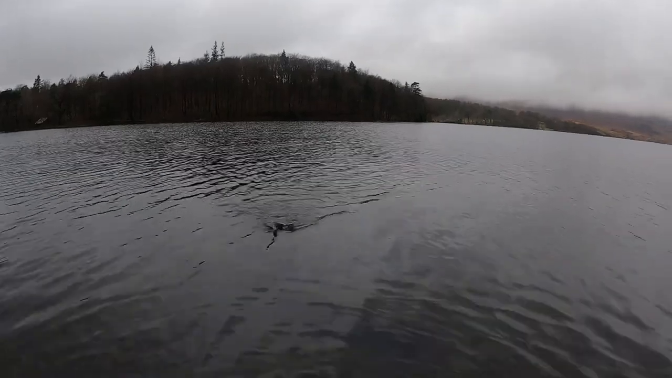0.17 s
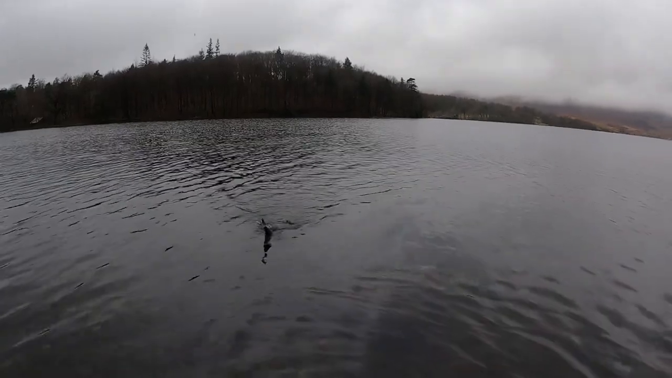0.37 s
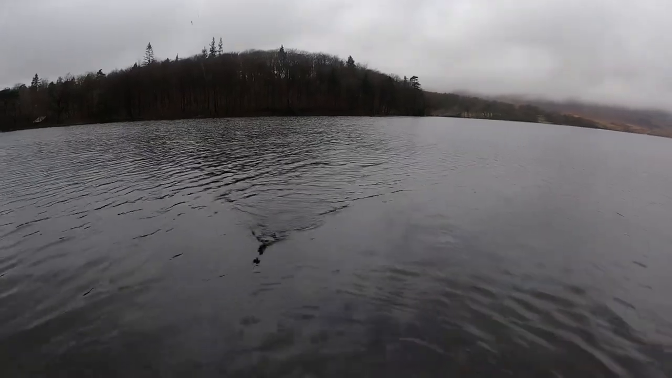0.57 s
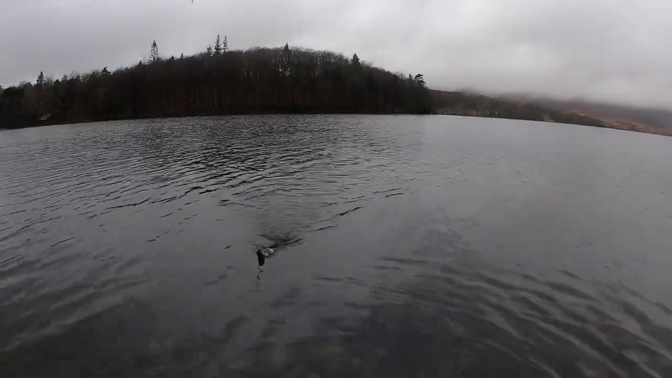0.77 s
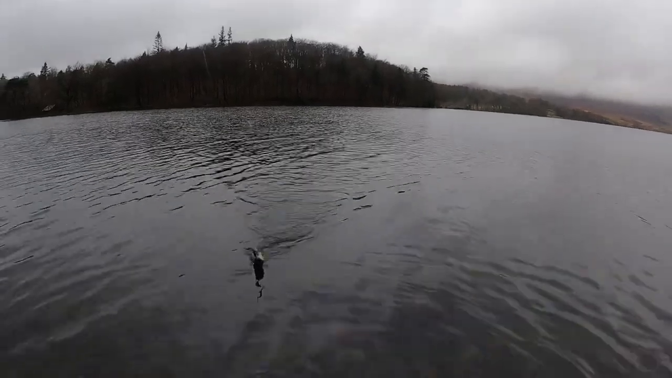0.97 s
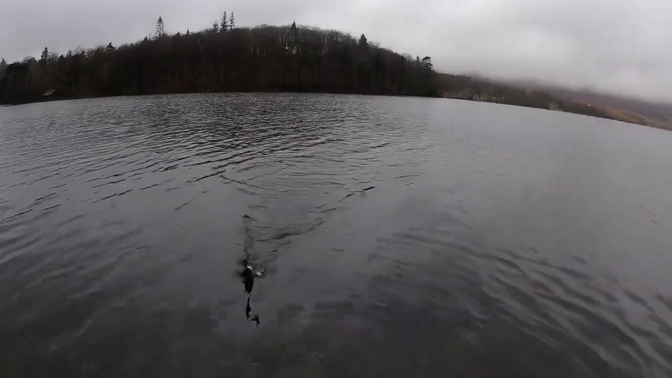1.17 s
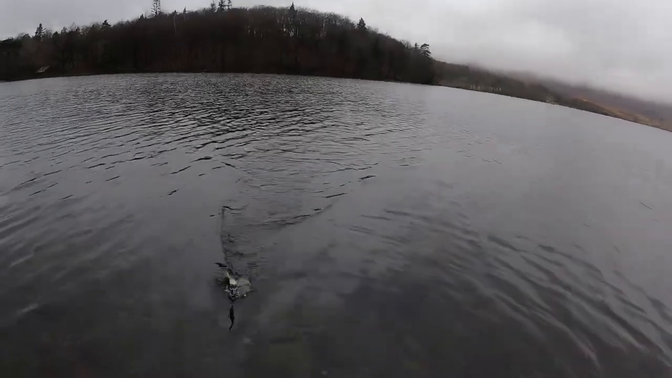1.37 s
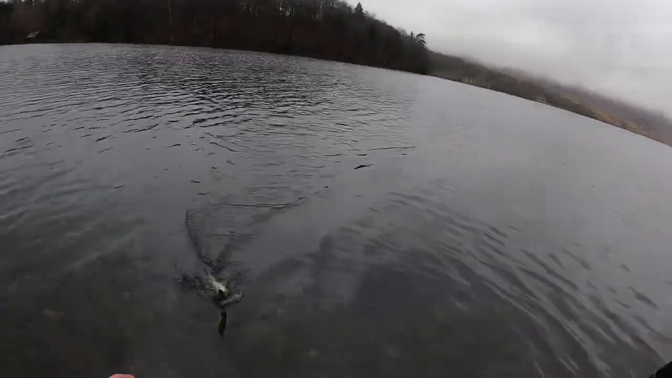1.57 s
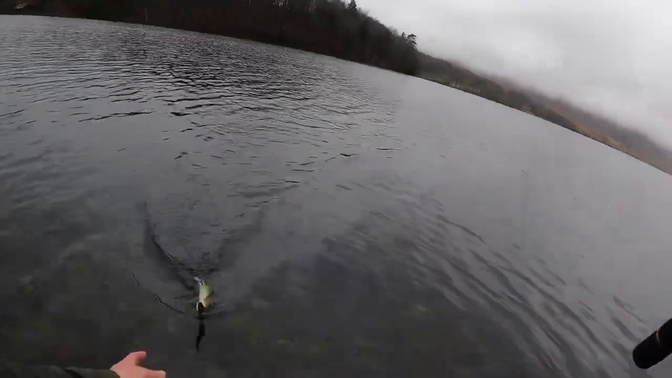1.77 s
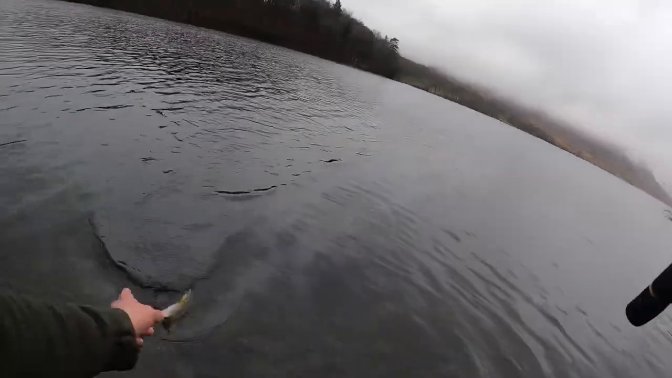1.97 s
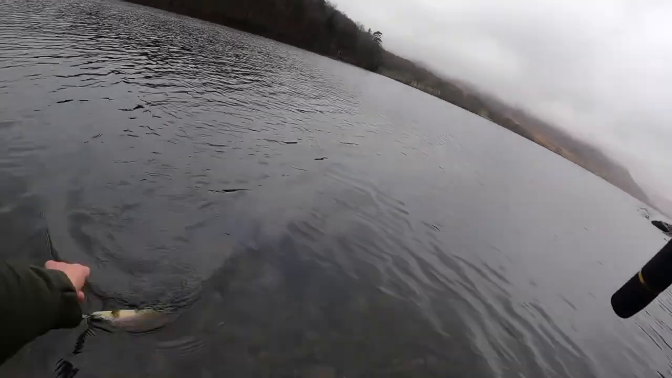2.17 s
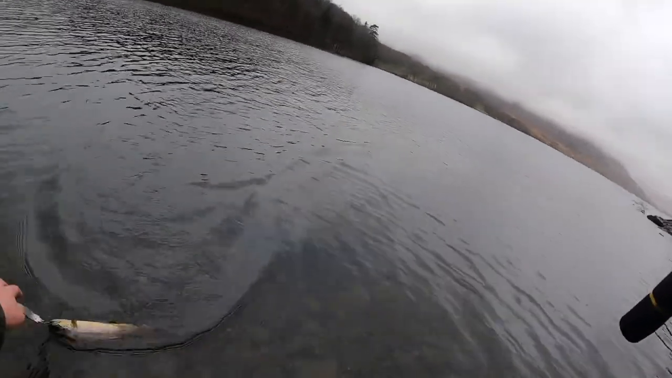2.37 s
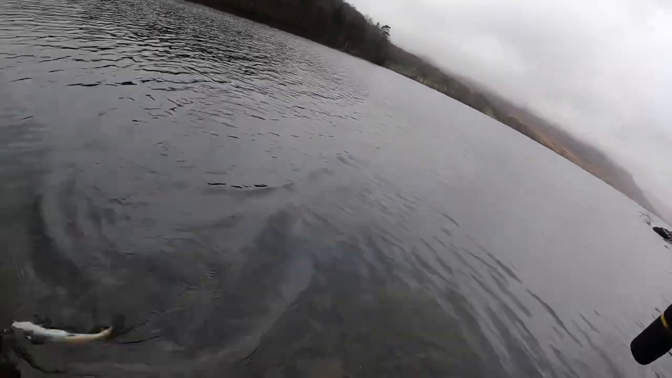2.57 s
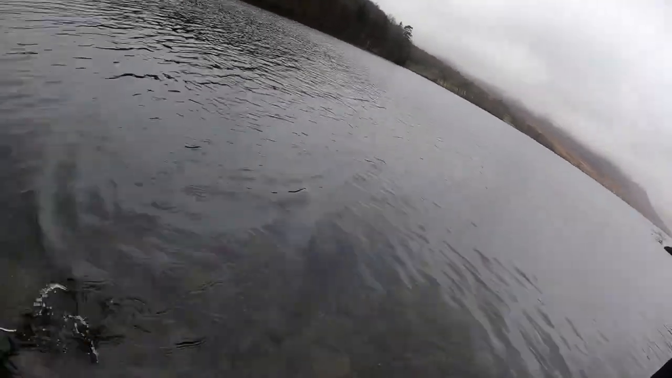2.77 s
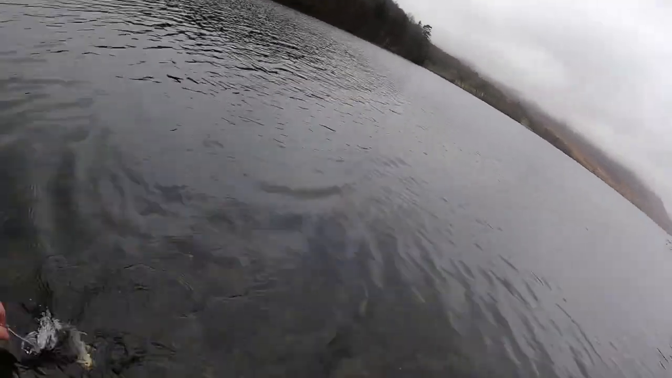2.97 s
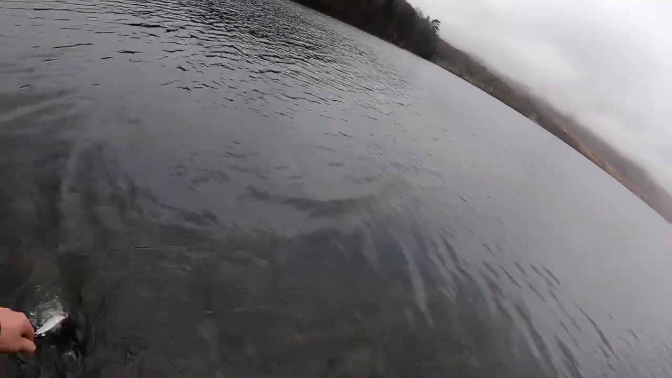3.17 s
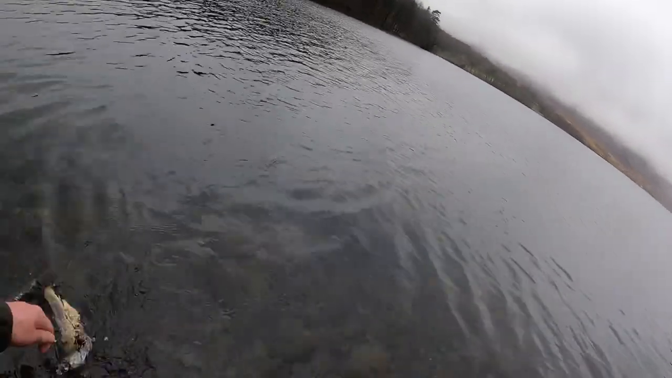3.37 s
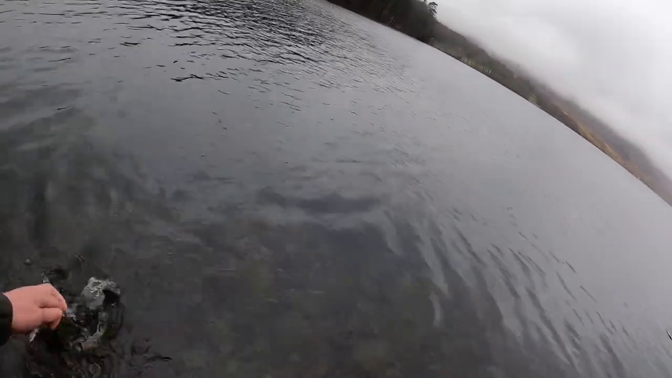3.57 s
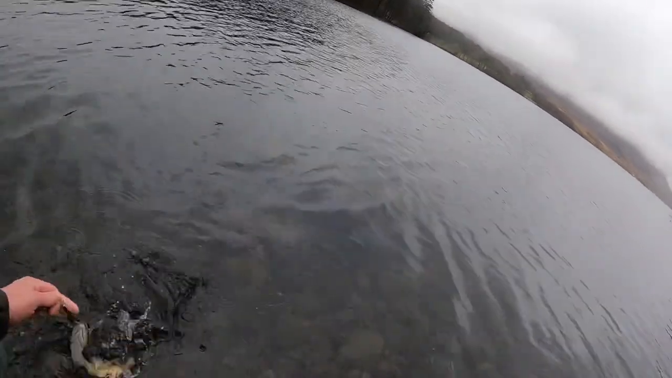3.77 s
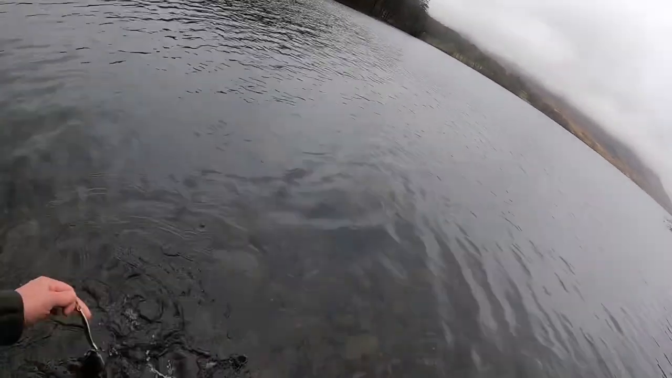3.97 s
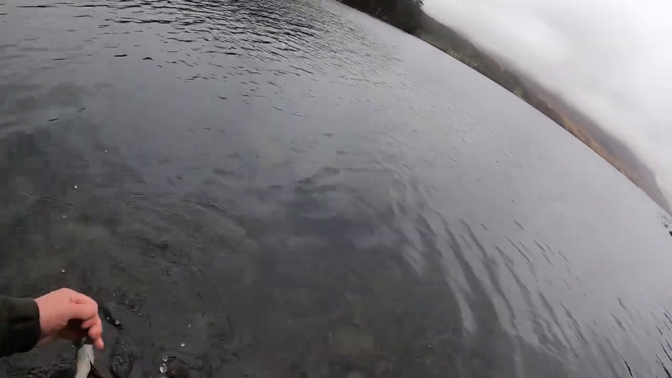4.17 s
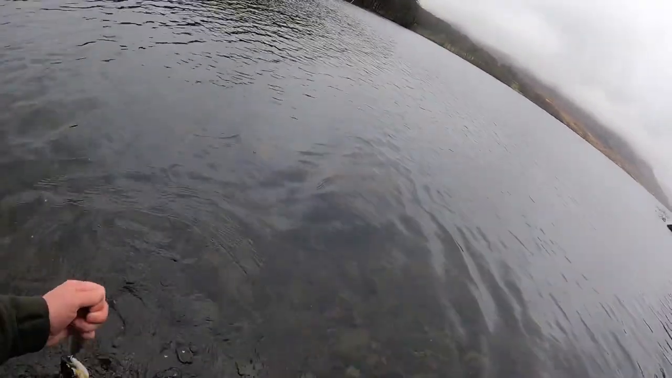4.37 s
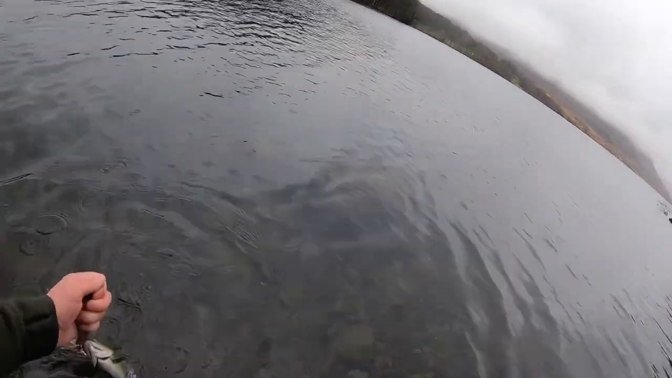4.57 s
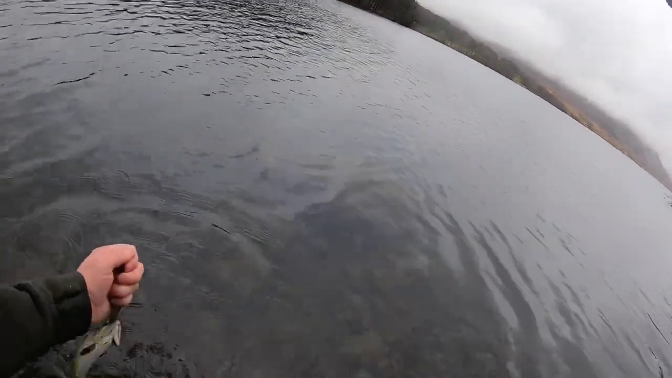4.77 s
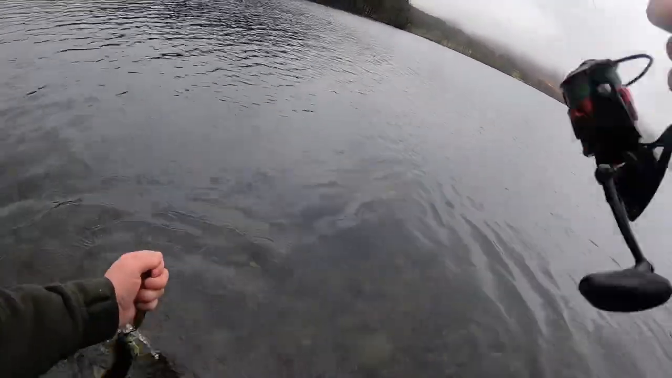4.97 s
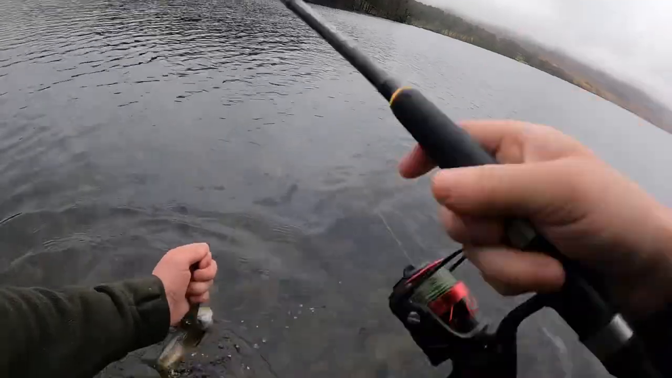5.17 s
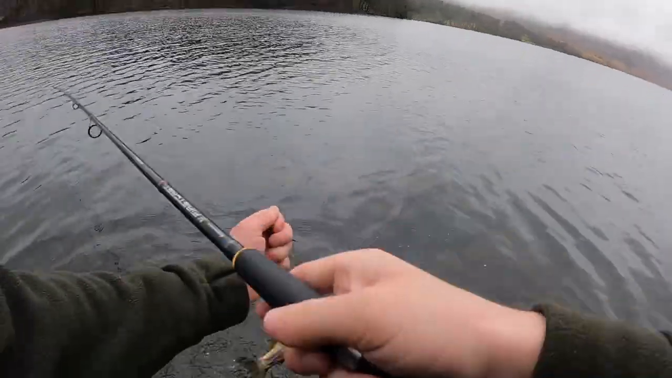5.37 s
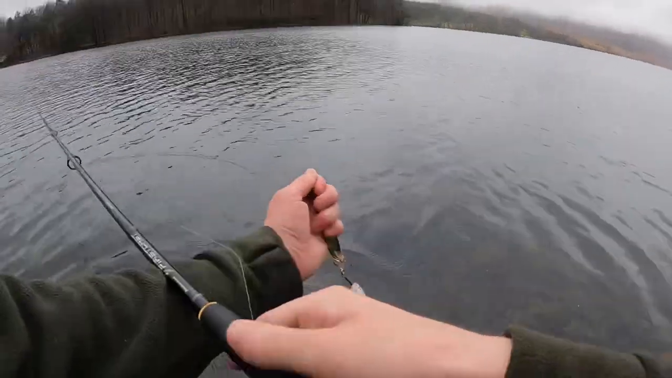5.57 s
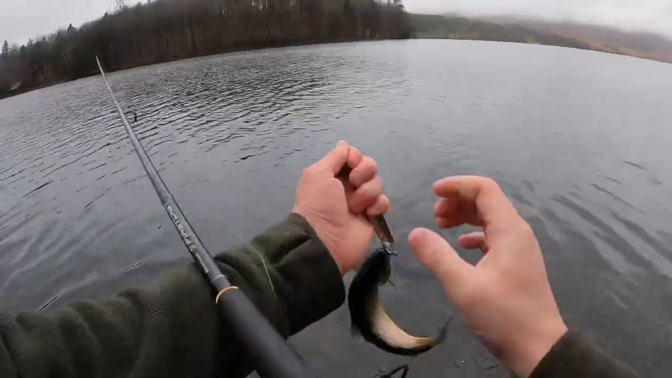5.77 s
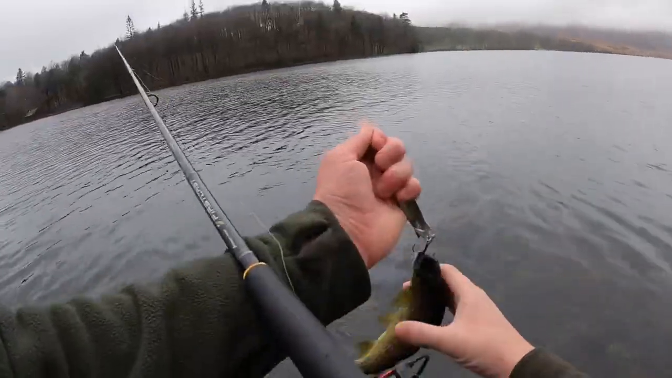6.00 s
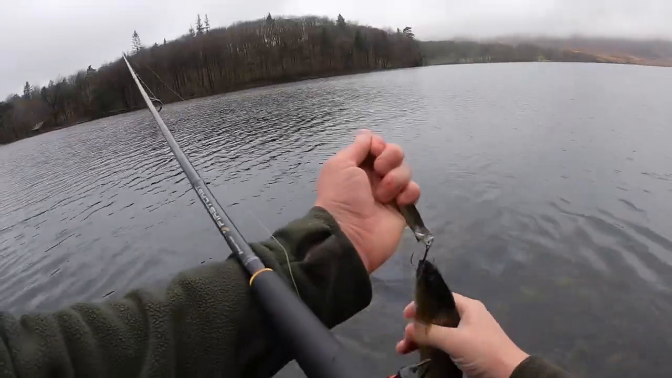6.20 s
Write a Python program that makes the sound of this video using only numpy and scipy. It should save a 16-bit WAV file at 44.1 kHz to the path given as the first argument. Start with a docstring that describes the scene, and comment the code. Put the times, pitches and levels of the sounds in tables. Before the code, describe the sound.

A small fish is drawn across a calm lake with light splashes and bubbly plinks. After a short lull it thrashes close by, slightly left, with sharp splashes, spray, a tail slap and a deep rising gulp. The splashing thins to drips as it is lifted out. A sleeve rustles and the rod bumps and clicks right at the body-worn microphone, over light wind rumble and faint distant lapping.

```python
"""A small fish is reeled across a calm lake, thrashes at the angler's feet and is lifted out on the line.
Each splash traps air bubbles that ring and glide in pitch, amid spray; drops fall from the hanging fish.
The microphone is worn on the body, with the water ahead and a little to the left. Close to it a sleeve
rustles and the rod is handled; light wind rumbles over distant lapping."""
import sys
import numpy as np
from scipy import signal
from scipy.fft import rfft, irfft, next_fast_len
from scipy.io import wavfile
from scipy.ndimage import uniform_filter1d

SR = 44100
rng = np.random.default_rng(int(sys.argv[2]) if len(sys.argv) > 2 else 0)


def store_wav(level_fs):
    """Save 16-bit WAV to argv[1]."""
    pcm = np.round(np.clip(np.atleast_2d(level_fs), -1, 1) * 32767)
    wavfile.write(sys.argv[1], SR, pcm.T.astype(np.int16))


N = 275000

# the fish stirs the water: start_s, length_s, churn_db, bubble_pitch_hz, spray_db
STROKES = [(0.0, 0.033, -47, 2190, -68.5), (0.163, 0.14, -56.5, 2680, -77), (0.371, 0.097, -58, 2500, -91),
           (0.639, 0.11, -59.5, 1520, -97), (1.079, 0.35, -60, 1624, -73), (1.5, 0.21, -61.5, 2340, -67),
           (2.778, 0.074, -48.5, 1445, -54), (2.858, 0.07, -53.5, 2590, -57),
           (3.039, 0.097, -50, 1566, -53), (3.129, 0.05, -53, 740, -63), (3.191, 0.04, -42, 1470, -48),
           (3.246, 0.038, -58, 850, -52), (3.292, 0.031, -54, 2410, -45), (3.37, 0.037, -47.5, 1820, -57),
           (3.52, 0.063, -48.5, 1960, -52.5), (3.573, 0.14, -43, 1460, -49.5),
           (3.773, 0.1, -41.5, 2240, -47.5), (3.87, 0.12, -52.5, 2700, -53), (4.03, 0.23, -54.5, 1250, -58),
           (4.271, 0.16, -50.5, 1895, -51.5), (4.593, 0.0082, -49.5, 1110, -46.5),
           (4.677, 0.17, -53.5, 1440, -59.5), (4.851, 0.065, -44.5, 1440, -52),
           (4.942, 0.21, -76, 2370, -59), (5.109, 0.012, -51.5, 4540, -43.5),
           (5.173, 0.12, -61, 2220, -58.5), (5.44, 0.051, -52, 3280, -50)]
STROKE_ATTACK_S = 0.0078
# bright hiss of fine droplets: frequency_hz, level_db
SPRAY_SPECTRUM = [(2000, -11), (3200, -8), (5200, 0.5), (8000, -3.5), (11500, -7), (13500, -15.5),
                  (15500, -32)]
# duller hiss of tearing water: frequency_hz, level_db
SHEET_SPECTRUM = [(400, -2.5), (1000, 5), (2200, 3), (3200, 0), (5200, -4), (8000, -22.5), (11500, -17),
                  (15000, -58)]


def from_db(db):
    """Decibels to gain."""
    return 10 ** (np.asarray(db) / 20)


def rms_one(x):
    """Scale to unit rms."""
    return x / np.sqrt(np.mean(x ** 2) + 1e-20)


def seconds(length):
    """Time axis of a short sound."""
    return np.arange(int(length * SR) + 2) / SR


def in_time(rows):
    """A curve of (time_s, value) points, sample by sample."""
    times, values = np.transpose(rows)
    return np.interp(np.arange(N) / SR, times, values)


def add(out, start_s, sound):
    """Mix a sound in from start_s."""
    at = max(round(start_s * SR), 0)
    out[at:at + len(sound)] += sound[:N - at]


def panned(x, pan_db):
    """Left louder by pan_db."""
    return x * from_db(pan_db * np.array([[.5], [-.5]]))


def colour(x, spectrum):
    """Shape by a spectrum that falls away steeply beyond its ends; rms 1."""
    hz, db = np.transpose(spectrum)
    size = next_fast_len(x.shape[-1])
    octave = np.log2(np.arange(size // 2 + 1) * SR / size + 1e-3)
    beyond = np.abs(octave - np.clip(octave, np.log2(hz[0]), np.log2(hz[-1])))
    gain = from_db(np.interp(octave, np.log2(hz), db) - 20 * beyond)
    return rms_one(irfft(rfft(x, size) * gain, size)[..., :x.shape[-1]])


def drift(per_s):
    """A random wander with about per_s turns a second; rms 1."""
    knots = rng.standard_normal(8192)
    return rms_one(np.interp(np.arange(N) / SR * per_s, np.arange(len(knots)), knots))


def stereo_noise(spectrum, side_db):
    """Coloured noise, mostly common to both channels; rms 1."""
    mid, side = rng.standard_normal((2, N))
    return colour(mid + from_db(side_db) * side * np.array([[1], [-1]]), spectrum)


def swell(t, length, attack_s, release_s):
    """Rise from t = 0, hold until length, die away."""
    return np.clip(t / attack_s, 0, 1) * np.exp(-np.clip((t - length) / release_s, 0, 20))


def swells(rows, attack_s, release_s):
    """Gain of overlapping swells (start_s, length_s, level_db); their powers add."""
    power = np.zeros(N)
    for start, length, db in rows:
        t = seconds(length + 10 * release_s) - min(start, 0)
        add(power, start, (from_db(db) * swell(t, length, attack_s, release_s)) ** 2)
    return np.sqrt(power)


def burst(spectrum, t60, attack_s=0.00055):
    """A puff of noise with a very quick onset, peak near 1."""
    t = seconds(t60)
    envelope = from_db(-60 * t / t60) * (1 - np.exp(-t / attack_s))
    noise = colour(rng.standard_normal(8192), spectrum)[:len(t)]
    return noise * envelope / envelope.max() / 2.5


def ring(hz, t60, rise=0, onset_cycles=0.44):
    """The dying sine of a bubble or a knock; its pitch changes by the fraction rise over t60 seconds."""
    t = seconds(t60)
    envelope = (1 - np.exp(-hz * t / onset_cycles)) * from_db(-60 * t / t60)
    return envelope * np.sin(2 * np.pi * hz * (t + rise * t * t / t60 / 2))


def swarm(per_s, low_hz, high_hz, cycles, spread_db, size=N):
    """Countless small bubbles of random size and strength, evenly active; rms 1."""
    out = np.zeros(N)
    for when, smallness, strength, ringing, rise in rng.random((int(per_s * size / SR), 5)):
        hz = low_hz * (high_hz / low_hz) ** smallness
        bubble = ring(hz, cycles * (.5 + ringing) / hz, 0.4 * rise ** 2, onset_cycles=2.4)
        add(out, when * (size - 1) / SR, from_db(spread_db * strength ** 2) * bubble)
    local_power = uniform_filter1d(out[:size] ** 2, size=2000)
    return out[:size] / np.sqrt(local_power + 1e-6)


def froth(spectrum):
    """Thousands of tiny bursts merge into a slightly grainy wash; rms 1."""
    return colour(rng.standard_normal(N) * from_db(2 * drift(700)), spectrum)


def churning(churn_db, froth_db, pitch_spread):
    """Each stroke folds in a cloud of bubbles around its own pitch, with a little froth."""
    gurgle, effort = np.zeros((2, N))
    t = seconds(.5)
    for start, length, db, hz, _ in STROKES:
        gain = from_db(db) * swell(t, length, STROKE_ATTACK_S, release_s=0.019)
        cloud = swarm(per_s=700, low_hz=hz / pitch_spread, high_hz=hz * pitch_spread,
                      cycles=26, spread_db=28, size=len(t))
        add(gurgle, start, gain * cloud)
        add(effort, start, gain)
    return from_db(churn_db) * gurgle + from_db(froth_db) * effort * froth(SHEET_SPECTRUM)


def crackle():
    """Fine droplets land in clumps as ticks of a few cycles; rms 1."""
    ticks = swarm(per_s=850, low_hz=2250, high_hz=14300, cycles=12, spread_db=25)
    clumps = from_db(3.5 * drift(45))
    return colour(np.diff(ticks, prepend=0) * clumps, SPRAY_SPECTRUM)


def spray(patter_db, mist_db, tick_db, drizzle_db, wake_db, wake_end_s):
    """Spray patters after each stroke and in the wake of the tow; what strokes throw up drizzles back."""
    throws = [(start, length, db) for start, length, _, _, db in STROKES]
    wake = from_db(wake_db) * (np.arange(N) / SR < wake_end_s)
    thrown = swells(throws, STROKE_ATTACK_S, release_s=0.043) + wake
    airborne = np.sqrt(np.minimum(thrown / from_db(-52), 1))   # gentle stirring lifts few droplets
    droplets = swarm(per_s=620, low_hz=2640, high_hz=12930, cycles=49, spread_db=42)
    patter = from_db(patter_db) * airborne * colour(droplets, SPRAY_SPECTRUM)
    ticks = from_db(tick_db) * crackle()
    mist = from_db(mist_db) * froth(SPRAY_SPECTRUM)
    falling = from_db(drizzle_db) * swells(throws, attack_s=0.09, release_s=0.18)
    drizzle = swarm(per_s=900, low_hz=1330, high_hz=8040, cycles=17, spread_db=21)
    return thrown * (patter + mist + ticks) + falling * drizzle


def gulps(level_db, flare_db, wobble_db, pitch_wobble):
    """Big air pockets ring low, creep up in pitch and quiver, then swoop and flare as their roof thins."""
    # pockets on their way to the surface: start_s, life_s, first_hz, last_hz, level_db, fade_db
    pockets = [(0.0, 0.099, 469, 800, -33, 37), (3.572, 0.064, 416, 1164, -27, 18.5),
               (4.0244, 0.3, 226.7, 1453, -13, 40), (4.17, 0.18, 360, 807, -40.5, 26),
               (5.547, 0.11, 546, 1390, -30, 26.5)]
    creep_share = 0.33   # the slow part of the climb
    swoop_at, swoop_width = 0.885, 0.1   # fractions of a pocket's life
    out = np.zeros(N)
    wander = drift(70)
    for start, life, first_hz, last_hz, db, fade_db in pockets:
        t = seconds(life)
        age = t / life
        quiver = wander[round(start * SR):][:len(t)] * age
        swoop = .5 + .5 * np.tanh((age - swoop_at) / swoop_width)
        climb = creep_share * age + (1 - creep_share) * swoop
        settling = 0.35 * np.exp(-t / 0.004)   # a new pocket starts sharp
        pitch = first_hz * (last_hz / first_hz) ** climb * (1 + settling + pitch_wobble * quiver)
        gain = from_db(db + level_db - fade_db * age + flare_db * swoop + wobble_db * quiver)
        edges = (1 - np.exp(-4 * first_hz * t)) * np.clip((1 - age) / swoop_width, 0, 1)
        add(out, start, gain * edges * np.sin(2 * np.pi * np.cumsum(pitch) / SR))
    return out


def diffuse_tail(water, spectrum, wet_db, t60):
    """The splashes smeared into a short dying tail, different in each channel."""
    t = seconds(t60)
    noise = colour(rng.standard_normal((2, 32768)), spectrum)[:, :len(t)]
    tail = noise * from_db(-60 * t / t60) * (t > .001)
    tail /= np.sqrt(np.sum(tail ** 2, axis=1, keepdims=True))
    return from_db(wet_db) * signal.fftconvolve(water[None], tail, axes=1)[:, :N]


def heard_from_bank(water):
    """Splashes follow the fish, mostly on the left; the right channel is shaded from their treble."""
    # direction of the fish: time_s, left_minus_right_db
    fish_pan = [(0, -1.5), (1.3, 0.5), (2.8, 4), (3.3, 3), (3.8, 1.6), (4.05, 1.5), (4.6, 2.5), (5.2, 2),
                (6.24, -2)]
    # a short bright shimmer that widens the spray's top: frequency_hz, level_db
    shimmer_spectrum = [(3000, -3), (9000, -6), (13000, -1.5), (15500, 7)]
    pan_db = in_time(fish_pan) + 2.6 * drift(49)   # drops land all around the fish
    treble = signal.sosfilt(signal.butter(1, 7000, "high", fs=SR, output="sos"), water)
    direct = panned(water, pan_db) + 0.19 * treble * np.array([[1], [-1]])
    shimmer = diffuse_tail(water, shimmer_spectrum, wet_db=-5, t60=0.082)
    bank_reflections = diffuse_tail(water, SHEET_SPECTRUM, wet_db=-24, t60=0.087)
    return direct + shimmer + bank_reflections


def wind(level_db, breeze_db):
    """A light breeze and a few puffs rumble at the microphone's ports."""
    # puffs: start_s, length_s, level_db
    gusts = [(-0.04, 0.13, -42), (0.34, 0.053, -47), (0.66, 0.46, -48), (3.46, 0.14, -46),
             (5.3, 0.61, -52.5)]
    # their rumble: frequency_hz, level_db
    rumble_spectrum = [(18, 4), (35, -4), (70, -1.5), (120, -14.5), (250, -23)]
    strength = np.hypot(from_db(breeze_db), swells(gusts, attack_s=0.01, release_s=0.13))
    lumps = from_db(level_db + 2 * drift(11))
    return panned(strength * lumps * stereo_noise(rumble_spectrum, side_db=-18), pan_db=-1.5)


def lake(level_db, lap_db):
    """Distant lapping merges into an even wash that wavers slightly."""
    # the wash: frequency_hz, level_db
    wash_spectrum = [(100, -5.5), (170, 3.5), (310, -6), (500, -14.5), (800, -22.5), (1500, -18.5),
                     (2700, -26), (4200, -35.5), (8000, -65), (11500, -39.5), (15500, -53)]
    return from_db(level_db + lap_db * drift(3.38)) * stereo_noise(wash_spectrum, side_db=-13.5)


def handling(thud_db, thud_cycles, scuff_db, scuff_t60, click_t60):
    """Each bump is a damped thud through the microphone mount and a brief scuff; the tackle clicks."""
    # bumps of rod, arm and jacket: start_s, level_db, pitch_hz, scuff_level_db
    bumps = [(0.003, -21, 212, -27.5), (0.008, -17.5, 69, -30), (0.04, -21, 71, -64), (0.106, -28, 36, -70),
             (5.314, -25.5, 95, -24), (5.325, -34, 156, -19.5), (5.339, -30, 182, -31.5),
             (5.353, -29.5, 30, -50), (5.579, -22.5, 280, -28.5), (5.589, -25, 125, -53),
             (5.765, -23.5, 326, -32.5), (5.779, -30, 290, -28), (5.874, -20.5, 318, -34)]
    # clicks of the tackle: start_s, level_db
    clicks = [(5.3138, -21), (5.3528, -23.5)]
    # tone of a scuff and of a click: frequency_hz, level_db
    scuff_spectrum = [(100, 15), (500, 4.5), (1200, 7), (2800, -18), (5000, -6.5), (12000, -26)]
    click_spectrum = [(500, -3), (1200, 13), (3000, 14.5), (6500, 0), (11000, -1.5), (15500, -26)]
    # side on which they reach the microphone: time_s, left_minus_right_db
    bump_pan = [(0, -7), (5.3, 1.5), (6.24, -0.5)]
    out = np.zeros(N)
    for start, db, hz, scuff_level_db in bumps:
        add(out, start, from_db(db + thud_db) * ring(hz, thud_cycles / hz))
        add(out, start, from_db(scuff_level_db + scuff_db) * burst(scuff_spectrum, scuff_t60))
    for start, db in clicks:
        add(out, start, from_db(db) * burst(click_spectrum, click_t60))
    return panned(out, in_time(bump_pan))


def plinks(ring_db, snap_db, snap_t60, linger_db, linger_cycles):
    """Single bubbles: a snap as the cavity closes, a gliding ring and a weak ring that lingers."""
    # the clearest bubbles: start_s, pitch_hz, level_db, rise_fraction (negative falls)
    bubbles = [(0.0197, 1320, -26.5, -0.48), (0.083, 750, -37.5, -0.066), (0.168, 1360, -32, 0.83),
               (0.2072, 2200, -41, 0.82), (0.286, 1980, -46, 0.97), (0.4442, 640, -34.5, 0.12),
               (0.5757, 1725, -39, 0.047), (0.6548, 3500, -40, -0.1), (0.7277, 1400, -41, 0.04),
               (0.855, 2380, -40, 0.27), (1.0669, 1690, -31, -0.45), (1.1453, 1210, -38, 0.0045),
               (1.1922, 3150, -29, -0.17), (1.2787, 2710, -29.5, -0.42), (1.3766, 1074, -39.5, -0.1),
               (1.5378, 2590, -39, 0.56), (1.603, 1490, -40, 0.55), (1.6946, 3300, -35.5, -0.39),
               (1.7168, 3270, -38.5, -0.12), (2.7281, 1290, -25, -0.71), (2.789, 1047, -30, -0.67),
               (2.8077, 2510, -19, 0.15), (2.809, 850, -28.5, -0.16), (2.8266, 2760, -27.5, -0.14),
               (2.8657, 2640, -24, 0.59), (2.891, 2840, -32.5, -0.12), (2.918, 2370, -35, 0.88),
               (2.933, 2020, -31.5, -0.47), (3.0353, 1355, -28.5, -0.42), (3.0954, 1150, -28, -0.12),
               (3.2205, 965, -27.5, -0.22), (3.29, 613, -37, -0.027), (3.3732, 1080, -30.5, -0.54),
               (3.5187, 1240, -31.5, 0.56), (3.5901, 1620, -25.5, 0.14), (3.6193, 790, -26, -0.23),
               (3.637, 1430, -27, -0.062), (3.6549, 596, -34.5, 0.29), (3.698, 1170, -32, -0.08),
               (3.749, 1320, -28, -0.37), (3.8323, 2085, -19, 0.28), (3.8457, 1784, -20, 0.69),
               (3.914, 3130, -27, 0.69), (4.0238, 1264, -17, -0.64), (4.092, 766, -37.5, 0.1),
               (4.149, 1370, -33.5, -0.026), (4.326, 2880, -31.5, 0.6), (4.3816, 3480, -32, 0.043),
               (4.495, 1290, -34.5, -0.32), (4.5976, 873, -27.5, 0.85), (4.6006, 1146, -27, 1.0),
               (4.6055, 733, -33, 0.45), (4.6995, 1650, -33.5, -1.2), (4.8477, 444, -25.5, 0.61),
               (4.8494, 943, -20, 0.37), (4.8606, 1436, -26.5, -0.12), (4.8625, 2610, -28, 1),
               (4.8758, 753, -20.5, 0.98), (4.9002, 1230, -28.5, 0.015), (4.995, 3130, -27, 0.98),
               (5.129, 4100, -27, 0.16), (5.15, 3530, -30.5, 0.03), (5.1963, 2360, -35, -0.05),
               (5.2792, 930, -34.5, 0.46), (5.5249, 2360, -30.5, 0.93)]
    # the closing cavity: frequency_hz, level_db
    snap_spectrum = [(400, 2), (1200, 0), (2500, 12.5), (5000, -3), (9000, -3.5), (15000, -22)]
    out = np.zeros(N)
    for start, hz, db, rise in bubbles:
        t60 = 0.037 * (1080 / hz) ** 0.6   # smaller bubbles die sooner
        add(out, start, from_db(db + ring_db) * ring(hz, t60, rise, onset_cycles=0.4))
        softening_db = 2 * rise   # bubbles that climb are pinched off gently, under the surface
        add(out, start, from_db(db + snap_db - softening_db) * burst(snap_spectrum, snap_t60))
        linger = ring(hz * (1 + .5 * rise), linger_cycles / hz, rise=0.15, onset_cycles=10)
        add(out, start, from_db(min(db, -22) + linger_db) * linger)
    return out


def water_sheets(level_db):
    """Sheets of water thrown by the tail tear with a hiss."""
    # each sheet: start_s, length_s, level_db
    sheets = [(0.442, 0.0073, -39.5), (3.193, 0.033, -47), (3.328, 0.025, -43), (3.575, 0.061, -44),
              (3.76, 0.023, -40), (3.806, 0.017, -30.5), (3.826, 0.023, -32)]
    gain = np.zeros(N)
    for start, length, db in sheets:
        add(gain, start, from_db(db + level_db) * signal.windows.tukey(int(length * SR), .2))
    return gain * froth(SHEET_SPECTRUM)


def smacks(crack_db, crack_t60, ping_db, ping_t60):
    """A drop or fin hits the surface with a very short crack, centred on its tiny ping."""
    # hits on the water: start_s, level_db, pitch_hz
    hits = [(1.1708, -38, 7260), (1.5877, -33, 6140), (2.7283, -35, 5260), (2.7526, -30, 2200),
            (2.789, -26.5, 3800), (2.8075, -18.5, 6500), (3.0115, -37.5, 5040), (3.1333, -32, 5100),
            (3.2031, -28.5, 7000), (3.2413, -30, 5270), (3.3464, -19, 5100), (3.3575, -28, 5500),
            (3.488, -32.5, 8230), (3.572, -20.5, 2570), (3.6545, -26.5, 6800), (3.6686, -22, 4870),
            (3.8232, -13, 5200), (3.8873, -29.5, 6130), (3.9386, -29, 4500), (3.7837, -21, 4230),
            (3.804, -32, 2010), (4.0236, -15.5, 7300), (4.1828, -32.5, 4250), (4.284, -33.5, 7200),
            (4.3672, -26, 7400), (4.4092, -35, 6000), (4.6955, -27.5, 5600), (4.506, -39, 6700),
            (4.605, -41.5, 5430), (4.9541, -33, 5440), (4.9932, -30.5, 6570), (5.0355, -32.5, 5900),
            (5.101, -40, 4900), (5.1175, -29, 6900), (5.2662, -28.5, 4200)]
    out = np.zeros(N)
    for start, db, hz in hits:
        crack_spectrum = [(hz / 4, -7), (hz, 0), (hz * 1.74, -9), (hz * 2.8, -30)]
        add(out, start, from_db(db + crack_db) * burst(crack_spectrum, crack_t60))
        add(out, start, from_db(db + ping_db) * ring(hz, ping_t60, rise=0.23, onset_cycles=1.4))
    return out


def sleeve(level_db, grain_db, bend_s):
    """Close to the microphone, cloth drags in small catches as an arm moves: a dull rub, a fine swish."""
    # arm movements in the jacket: start_s, length_s, rub_db, swish_db
    reaches = [(1.714, 0.62, -63, -70.5), (1.84, 0.17, -70, -63.5), (5.286, 0.063, -48, -48),
               (5.441, 0.15, -51, -51.5), (5.764, 0.11, -47, -50.5), (5.933, 0.22, -63, -59.5)]
    # tone of the rub and of the swish: frequency_hz, level_db
    rub_spectrum = [(40, -7), (130, -1.5), (330, 0.5), (600, -11), (1200, -53.5), (2500, -43)]
    swish_spectrum = [(600, 4.5), (1500, 4), (3000, 1), (5000, 1), (7500, -1), (9000, -10.5), (12000, -7),
                      (15000, -32)]
    attack_s, release_s = 0.065, 0.1
    moves = np.array(reaches)
    bent = np.clip((np.arange(N) / SR - bend_s) / attack_s, 0, 1)   # bending down keeps the cloth astir
    rub_gain = np.hypot(bent * from_db(-67), swells(moves[:, [0, 1, 2]], attack_s, release_s))
    swish_gain = np.hypot(bent * from_db(-69.5), swells(moves[:, [0, 1, 3]], attack_s, release_s))
    catches_db = grain_db * drift(140)
    rub = rub_gain * from_db(catches_db) * stereo_noise(rub_spectrum, side_db=-12)
    swish = swish_gain * from_db(catches_db / 2) * stereo_noise(swish_spectrum, side_db=-5.5)
    return from_db(level_db) * (rub + swish)


def tail_slap(start_s, pop_db, hz, t60, crack_db):
    """The tail lands flat and claps a pocket of air: a hard pop of a few cycles."""
    out = np.zeros(N)
    add(out, start_s, from_db(pop_db) * (ring(hz, t60) + .5 * ring(1.43 * hz, t60)))
    add(out, start_s, from_db(crack_db) * burst(SHEET_SPECTRUM, t60 / 2))
    return out


def line_slide(start_s, length_s, level_db):
    """The line slides through the fingers with a short hiss."""
    hiss_spectrum = [(3500, -6.5), (5500, 1), (7500, -5), (12000, -14)]   # frequency_hz, level_db
    gain = swells([(start_s, length_s, level_db)], attack_s=0.012, release_s=0.026)
    return gain * stereo_noise(hiss_spectrum, side_db=-16)


def scene():
    """The fish in the water ahead, the angler right at the microphone, the open lake behind it all."""
    water = churning(churn_db=-1, froth_db=-11.5, pitch_spread=2.016)
    water += spray(patter_db=-2, mist_db=-11, tick_db=-2.5, drizzle_db=-14.5,
                   wake_db=-69.5, wake_end_s=1.75)
    water += plinks(ring_db=-2, snap_db=-7.5, snap_t60=0.0065, linger_db=-9.5, linger_cycles=49)
    water += water_sheets(level_db=-3.5)
    water += smacks(crack_db=1, crack_t60=0.0049, ping_db=1.5, ping_t60=0.0048)
    water += tail_slap(start_s=3.8246, pop_db=-4, hz=1160, t60=0.0097, crack_db=-15)
    fish = heard_from_bank(water) + gulps(level_db=-0.5, flare_db=23.5, wobble_db=3, pitch_wobble=0.063)
    angler = handling(thud_db=10.5, thud_cycles=2.5, scuff_db=-1, scuff_t60=0.014, click_t60=0.005)
    angler += sleeve(level_db=1, grain_db=3, bend_s=1.4)
    angler += line_slide(start_s=5.705, length_s=0.027, level_db=-49.5)
    return fish + angler + wind(level_db=0.5, breeze_db=-57.5) + lake(level_db=-56, lap_db=0.7)


def record(dry):
    """The top is cut steeply above 15.9 kHz."""
    return signal.sosfilt(signal.ellip(10, .1, 90, 15900, fs=SR, output="sos"), dry)


dry = scene()
out = record(dry)
store_wav(out)
```